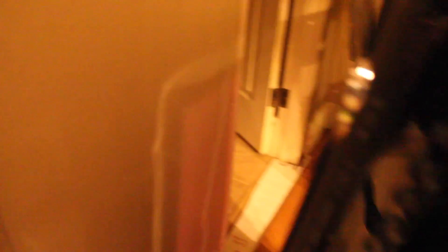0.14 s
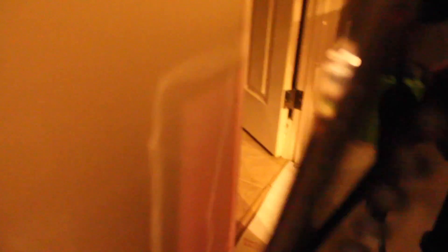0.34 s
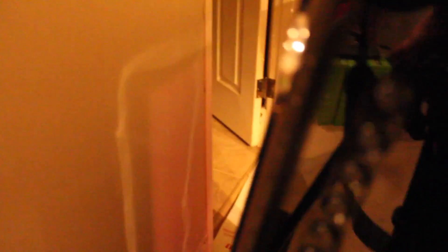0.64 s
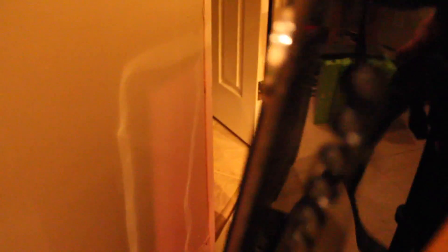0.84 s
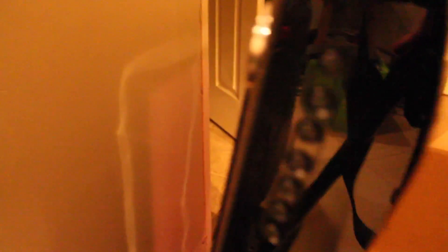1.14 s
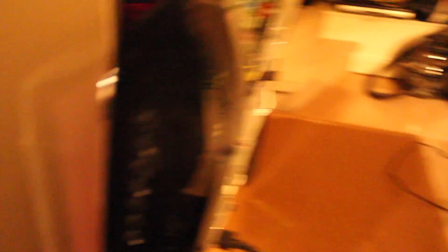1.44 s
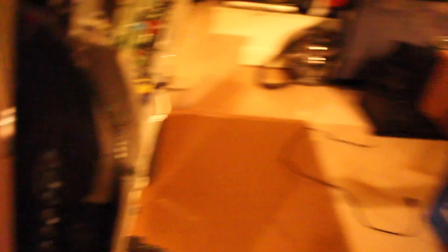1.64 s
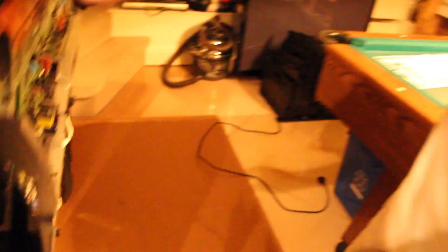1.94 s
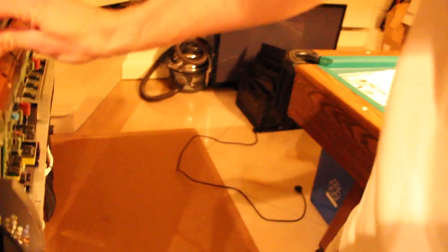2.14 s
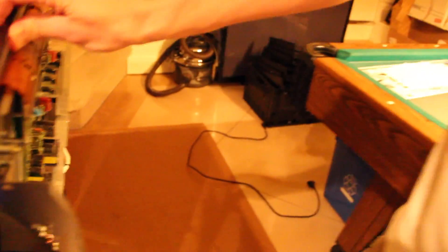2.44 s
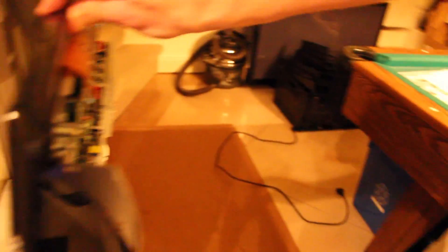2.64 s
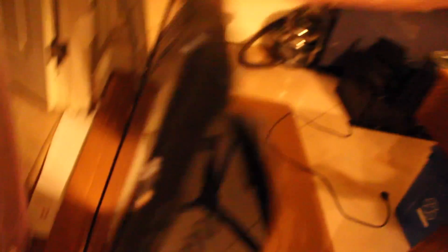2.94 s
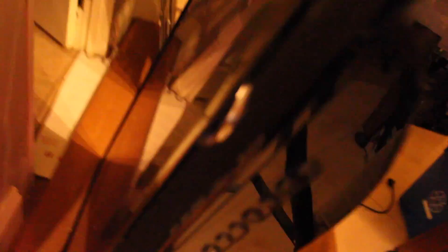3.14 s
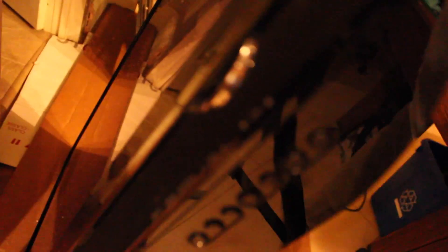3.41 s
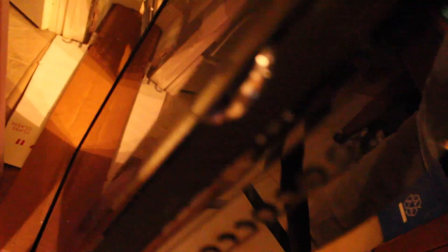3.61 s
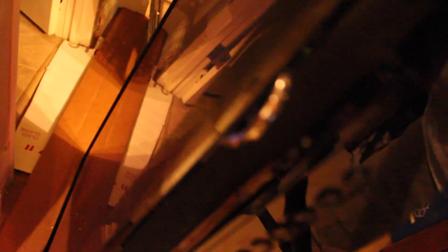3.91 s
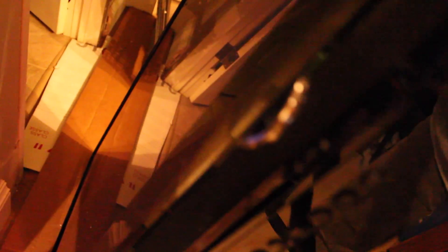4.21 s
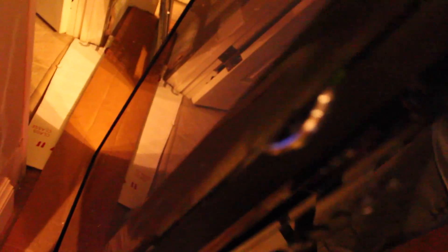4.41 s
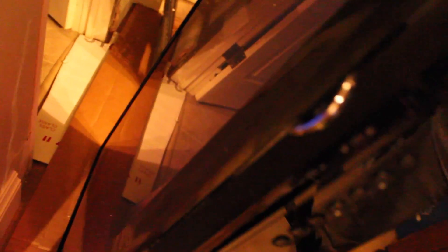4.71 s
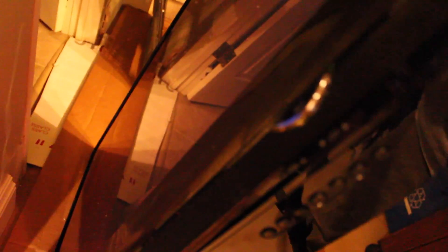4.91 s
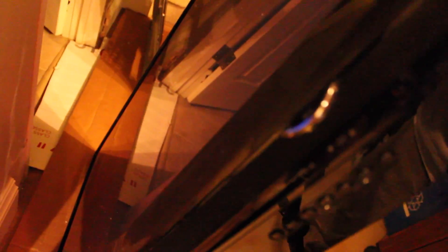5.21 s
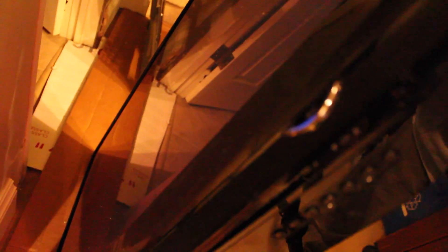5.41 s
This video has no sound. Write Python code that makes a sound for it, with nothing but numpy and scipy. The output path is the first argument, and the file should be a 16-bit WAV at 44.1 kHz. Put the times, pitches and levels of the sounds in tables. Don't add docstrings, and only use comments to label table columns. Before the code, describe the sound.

In a quiet furnished room, a handheld camera close to an open electronic device catches the fading tail of a thud, then a dense flurry of metal chassis knocks, dry plastic taps and crisp relay clicks. After a second and a half it thins: two thin metal pings, low camera bumps and rustling, a cluster of relay clicks around three seconds, then mostly hiss and one last snap near five.

```python
import sys
import numpy as np
from scipy import signal
from scipy.fft import rfft, irfft
from scipy.io import wavfile
from scipy.ndimage import uniform_filter1d

SR = 44100
rng = np.random.default_rng(int(sys.argv[2]) if len(sys.argv) > 2 else 0)


def transcribe(u):
    v = np.clip(np.atleast_2d(u).T, -1, 1)
    q = np.round(v * 32767).astype(np.int16)
    wavfile.write(sys.argv[1], SR, q)


def how_loud(loudness_db):
    steps = np.asarray(loudness_db, float) / 20
    return 10 ** steps


N = 244975


def evened(x):
    return x / np.sqrt(np.mean(x ** 2) + 1e-20)


def peaked(x):
    return x / (np.abs(x).max() + 1e-12)


def read(points, hz):
    f, value = np.transpose(points)
    return np.interp(np.log(hz + 1), np.log(f + 1), value)


def add(mix, start_s, sound):
    part = mix[round(start_s * SR):][:len(sound)]
    part += sound[:len(part)]


def noise(spectrum, patchy_db, size):
    frames = 4 * N // size + 5
    hz = np.fft.rfftfreq(size, 1 / SR)
    real, imaginary, patches = rng.standard_normal((frames, len(hz), 3)).T
    patches = uniform_filter1d(patches, size=10, axis=0)
    patches = evened(uniform_filter1d(patches, size=8, axis=1))
    level_db = read(spectrum, hz)[:, None] + patchy_db * patches
    z = (real + 1j * imaginary) * how_loud(level_db)
    return evened(signal.istft(z, nperseg=size, noverlap=3 * size // 4)[1][:N])


def ring(lines, spread, count):
    hz, db, t60 = np.transpose(lines)
    t = np.arange(count)[:, None] / SR
    fading = how_loud(db - 60 * t / t60)
    detune = rng.uniform(-0.9, 1, (3, len(hz)))
    clusters = sum(np.sin(2 * np.pi * hz * (1 + spread * u) * t) * fading for u in detune)
    return peaked(clusters.sum(1))


def struck_body(body, modes, body_db, thump_db, upper_db, tick_db):
    hz, db = np.transpose(body)
    db = db + [thump_db + 11.5, thump_db + 12.0, body_db - 8.0,
               upper_db + 2.5, upper_db + 1.5, tick_db - 4, tick_db - 2.5]
    bins = np.abs(np.fft.fftfreq(4096, 1 / SR))
    resonances = sum(lift / (1 + (2 * (bins - f) / width) ** 2) for f, width, lift in modes)
    db = read(np.transpose([hz, db]), bins) + resonances
    causal = np.exp(np.conj(signal.hilbert(np.log(how_loud(db)))))
    return np.fft.ifft(causal).real[:2048]


def contact_burst(rise_ms, chatter_ms, lead_db, rebound_ms, rebound_db):
    ms = np.arange(2048) / SR * 1000
    shape = (1 - np.exp(-ms / rise_ms)) * np.exp(-ms / chatter_ms)
    shape += how_loud(rebound_db) * np.interp(ms - rebound_ms, ms, shape, left=0)
    uneven = how_loud(1.8 * rng.standard_normal(len(ms)))
    contacts = rng.standard_normal(len(ms)) * uneven * shape
    add(contacts, rise_ms / 1000, how_loud([lead_db]))
    z = rfft(contacts, 4096)
    white = z / np.sqrt(uniform_filter1d(np.abs(z) ** 2, size=50))
    return irfft(white)[:2048]


# frequency in Hz, time to fall by 60 dB in seconds.
ROOM_FADE = [(150, 0.34), (600, 0.31), (2000, 0.32), (5000, 0.4), (10000, 0.22), (16000, 0.11)]


def room_tail():
    echoes = np.zeros(SR // 2)
    at = np.arange(300, SR // 2 - 12, 12)
    echoes[at + rng.integers(0, 12, len(at))] = rng.choice([-1., 1.], len(at))
    hz, t, z = signal.stft(echoes, SR, nperseg=256)
    fading = how_loud(-60 * t / read(ROOM_FADE, hz)[:, None])
    tail = signal.istft(z * fading, SR, nperseg=256)[1]
    return tail / np.linalg.norm(tail)


def hit(row, law, body, modes, drive_db, **contact):
    _, body_db, thump_db, hard_db = row
    upper_db, share, room_db = law
    upper_db = body_db + upper_db + share * hard_db
    response = struck_body(body, modes, body_db, thump_db, upper_db, tick_db=body_db + hard_db)
    response = how_loud(drive_db) * response
    contacts = contact_burst(**contact)
    sound = how_loud(room_db) * signal.fftconvolve(response, room_tail())
    add(sound, 0, signal.fftconvolve(response, contacts))
    return sound


# start in seconds, body in dB, thump in dB, hardness (tick over body) in dB.
SNAPS = [
    (0.236, -40.5, -52.5, 4.5),
    (0.296, -57.5, -52, 10),
    (0.574, -42, -50, 7.5),
    (0.645, -33.5, -52, -1.5),
    (1.815, -38.5, -66, 2),
    (2.702, -34.5, -42.5, -3),
    (3.205, -33, -47, -3),
    (4.954, -35.5, -45, 0.5),
]
# frequency in Hz, level in dB.
RELAY_COLOUR = [(60, -18.5), (200, 8), (900, 3), (2300, 3), (4000, -1.5), (7000, -2), (16000, -11)]
# frequency in Hz, width in Hz, lift in dB.
RELAY_RESONANCES = [(700, 120, 13.5), (1013, 170, 12.5), (1460, 280, -2.5), (1780, 67, 1), (2220, 160, 2.5),
                    (3250, 80, 6), (3730, 80, 10), (4320, 200, 5.5), (6420, 170, 0), (7780, 410, 5)]
# upper body over body in dB, share of hardness reaching the upper body, room in dB.
SNAP_LAW = (-.6, 0.45, -8)


def relay_snaps():
    mix = np.zeros(N)
    for row in SNAPS:
        add(mix, row[0], hit(row, SNAP_LAW, RELAY_COLOUR, RELAY_RESONANCES, drive_db=28.5, rise_ms=0.18,
                             chatter_ms=4.2, lead_db=11.5, rebound_ms=6, rebound_db=-4))
    return mix


# start in seconds, body in dB, thump in dB, hardness in dB.
RELEASES = [
    (0.504, -27.5, -46, -10),
    (0.847, -23.5, -57, -20.5),
    (3.147, -44, -73, -6),
    (3.415, -28.5, -51, -19),
    (3.472, -27.5, -40, -16.5),
]
# frequency in Hz, level in dB.
RELEASE_COLOUR = [(60, -23), (200, 8.5), (900, 6.5), (2200, -0.5), (4000, -5), (7000, 0), (16000, -10)]
# frequency in Hz, width in Hz, lift in dB.
RELEASE_RESONANCES = [(738, 92, 6.8), (1040, 110, 3.6), (2120, 250, 4.5), (2960, 390, 4.7),
                      (3940, 180, 9.7), (7600, 660, 4.8)]
# upper body over body in dB, share of hardness reaching the upper body, room in dB.
FALL_LAW = (1, 0.53, -11.5)


def relay_releases():
    mix = np.zeros(N)
    for row in RELEASES:
        add(mix, row[0], hit(row, FALL_LAW, RELEASE_COLOUR, RELEASE_RESONANCES, drive_db=27.5, rise_ms=0.46,
                             chatter_ms=5.4, lead_db=15.5, rebound_ms=5, rebound_db=-4))
    return mix


# frequency in Hz, level in dB, time to fall by 60 dB in seconds.
ARMATURE_LINES = [(677, -5, 0.32), (1790, 1, 0.52), (2650, -4, .3), (3300, -4, .35), (3620, -5, .5),
                  (4300, -3, .4), (5100, -5, .25)]
ARMATURE_PEAKS = [-51, -62, -55, -44, -56, -50, -40, -54]


def armature_ring():
    mix = np.zeros(N)
    for row, ring_db in zip(SNAPS, ARMATURE_PEAKS):
        add(mix, row[0], how_loud(ring_db) * ring(ARMATURE_LINES, spread=0.012, count=12000))
    return mix


# start in seconds, body in dB, thump in dB, hardness in dB.
CHASSIS_KNOCKS = [(0.693, -31.5, -46, -30), (0.796, -63, -47, -7), (0.86, -30, -38, -28),
                  (0.983, -61, -47, -10), (1.119, -40.5, -53, -14.5), (1.155, -31.5, -49.5, -42.5),
                  (1.173, -28, -45.5, -35), (1.3, -62.5, -69, 0), (2.211, -33, -59, -34.5),
                  (2.257, -51, -51, -26), (2.532, -47, -55, -36), (2.855, -49, -50, -16),
                  (3.722, -46.5, -66, -31),
                  (.004, -17.5, -49, -24), (0.022, -31.5, -55, -12), (0.049, -26, -62, -30),
               (.110, -24.5, -43, -24), (0.499, -36, -49, -32), (.543, -26, -36.5, -44),
               (.738, -38, -43.5, -26), (1.0259, -25.5, -28, -21), (1.0309, -21, -39.5, -30),
               (3.172, -48, -64, -34), (3.196, -45, -66, -41), (3.393, -48, -51.5, -21)]
# frequency in Hz, level in dB.
CHASSIS_COLOUR = [(70, -5.5), (170, 4.5), (900, 1.5), (1900, 4), (3500, -5.5), (6000, 4), (16000, -19)]
# frequency in Hz, width in Hz, lift in dB.
CHASSIS_RESONANCES = [(665, 350, 6.8), (1200, 220, 7.4), (1690, 190, 1.2), (3000, 300, 1.4),
                      (5660, 660, 2.8)]
# upper body over body in dB, share of hardness reaching the upper body, room in dB.
KNOCKING_LAW = (7, 0.71, -7.5)


def chassis_knocks():
    mix = np.zeros(N)
    for row in CHASSIS_KNOCKS:
        add(mix, row[0], hit(row, KNOCKING_LAW, CHASSIS_COLOUR, CHASSIS_RESONANCES, drive_db=26.5, rise_ms=0.58,
                             chatter_ms=4.2, lead_db=10, rebound_ms=4, rebound_db=-12))
    return mix


# start in seconds, body in dB, thump in dB, hardness in dB.
SOLID_BLOWS = [
    (0.512, -13, -43, -34.5),
    (.521, -30.5, -47, -5),
    (0.5246, -18, -35.5, -15.5),
    (0.5601, -24, -44, -19.5),
    (0.6016, -24.5, -67, -30),
    (1.040, -19, -53, -30.5),
    (1.0803, -20, -58, -29.5),
    (1.145, -39, -51, -12.5),
    (1.619, -37, -69, -30),
]
# upper body over body in dB, share of hardness reaching the upper body, room in dB.
SOLID_LAW = (5.6, .6, -13)


def chassis_clatter():
    mix = np.zeros(N)
    for row in SOLID_BLOWS:
        add(mix, row[0], hit(row, SOLID_LAW, CHASSIS_COLOUR, CHASSIS_RESONANCES, drive_db=26, rise_ms=1.12,
                             chatter_ms=1.97, lead_db=7, rebound_ms=3, rebound_db=-14))
    return mix


# start in seconds, body in dB, thump in dB, hardness in dB.
DRY_TAPS = [
    (0.397, -22.5, -40.5, -39),
    (0.761, -20, -35.5, -44),
    (1.449, -31.5, -78, -38),
    (1.89, -29.5, -54, -23.5),
    (3.104, -27, -55.5, -18),
]
# frequency in Hz, level in dB.
PLASTIC_COLOUR = [(100, -51), (330, -0.5), (1150, 5), (1900, 3.5), (3300, -8), (4200, 8.5), (14000, -17)]
# frequency in Hz, width in Hz, lift in dB.
PLASTIC_RESONANCES = [(1180, 74, 4.6), (1510, 320, 4.2), (2200, 200, 5.1), (3020, 400, 3.2),
                      (4000, 260, 7.7), (4640, 190, 3), (5600, 200, 6.9)]
# upper body over body in dB, share of hardness reaching the upper body, room in dB.
TAPPING_LAW = (-7, .17, -16.5)


def plastic_taps():
    mix = np.zeros(N)
    for row in DRY_TAPS:
        add(mix, row[0], hit(row, TAPPING_LAW, PLASTIC_COLOUR, PLASTIC_RESONANCES, drive_db=29.5, rise_ms=0.55,
                             chatter_ms=1.74, lead_db=9, rebound_ms=2.7, rebound_db=-5))
    return mix


# start in seconds, body in dB, thump in dB, hardness in dB.
METAL_PINGS = [
    (1.625, -36, -53, -4),
    (1.937, -34.5, -69, -0.5),
]
# frequency in Hz, level in dB.
SPRING_COLOUR = [(150, -16), (400, -8), (1300, 4), (2200, 0.5), (3800, 3), (5800, 1.5), (15000, -5.5)]
# frequency in Hz, width in Hz, lift in dB.
FIRST_RESONANCES = [(1313, 30, 21.4), (1800, 220, 8.5), (3200, 630, 8), (4900, 400, 7.8), (5800, 400, 4.8),
                    (7300, 420, 11.6), (10700, 770, 9.8)]
SECOND_RESONANCES = [(1376, 140, 9.9), (1990, 420, 10.3), (3850, 310, 17.2), (4860, 450, 5.9),
                     (5570, 620, 11.8), (6440, 430, 8)]
# frequency in Hz, level in dB, time to fall by 60 dB in seconds.
FIRST_LINES = [(1300, -9, 0.3), (1760, -3, 0.32), (4790, 3, .25), (5300, -15, .3), (6000, -14, .25),
               (7230, -22, .2)]
SECOND_LINES = [(3940, -10, .18), (3870, 2, 0.63), (5300, 3, .2)]
# upper body over body in dB, share of hardness reaching the upper body, room in dB.
PINGING_LAW = (-11.5, .2, -1.5)


def metal_pings():
    mix = np.zeros(N)
    parts = [(FIRST_RESONANCES, FIRST_LINES, -41), (SECOND_RESONANCES, SECOND_LINES, -42)]
    for row, (resonances, lines, ring_db) in zip(METAL_PINGS, parts):
        add(mix, row[0], how_loud(ring_db) * ring(lines, spread=0.0099, count=14000))
        add(mix, row[0], hit(row, PINGING_LAW, SPRING_COLOUR, resonances, drive_db=28, rise_ms=0.22,
                             chatter_ms=2.1, lead_db=-5, rebound_ms=2.5, rebound_db=-3))
    return mix


# frequency in Hz, level in dB per Hz.
THUD_COLOUR = [(35, -58), (60, -28), (212, -40), (315, -14), (363, -17), (417, -2), (749, -2.5),
               (903, -8.5), (1110, -4), (2840, -18.5), (16000, -52)]
# start level in dB, change in dB per second.
THUD_FADE = [(-25, -86.5), (-38.5, -67)]


def earlier_thud():
    clumps = uniform_filter1d(rng.standard_normal(N), size=150)
    clumps = evened(uniform_filter1d(clumps, size=150))
    wash = noise(THUD_COLOUR, patchy_db=-1.5, size=256) * how_loud(0.59 * clumps)
    treble = signal.sosfilt(signal.butter(2, 2500, "high", fs=SR, output="sos"), wash)
    t = np.arange(N) / SR
    body_fade, treble_fade = [how_loud(start_db + slope * t) for start_db, slope in THUD_FADE]
    return body_fade * evened(wash - treble) + treble_fade * evened(treble)


# start in seconds, peak in dB, frequency in Hz.
CAMERA_BUMPS = [(1.576, -38.5, 410), (1.608, -51, 40.6), (1.626, -35.5, 426), (1.729, -52, 48.7),
                (1.849, -50, 46), (1.899, -48, 61.4), (1.978, -46, 58.4), (2.061, -47, 45.4),
                (2.104, -43.5, 51.4), (2.15, -57, 65), (2.199, -55, 53.8)]


def camera_bumps():
    mix = np.zeros(N)
    t = np.arange(4000) / SR
    for start_s, peak_db, hz in CAMERA_BUMPS:
        wobble = np.sin(2 * np.pi * hz * t) * t * np.exp(-t * hz / 0.58)
        add(mix, start_s, how_loud(peak_db) * peaked(wobble))
    return mix


# start in seconds, hold in seconds, level in dB.
JOLTS = [(0.0, 0.0091, -52), (0.408, .02, -57.5), (0.525, .03, -59), (0.605, 0.23, -58), (1.02, .03, -59),
         (1.1, .05, -66), (1.598, 0.018, -54), (1.752, .2, -65), (1.96, 0.26, -62.5), (2.537, 0.035, -63),
         (2.707, 0.022, -61), (3.206, 0.017, -58), (3.41, .06, -63), (3.733, 0.85, -75.5),
         (4.96, 0.024, -59.5), (5.18, 0.018, -69), (5.442, .1, -74)]
# frequency in Hz, level in dB per Hz.
RUMBLE_COLOUR = [(15, -19), (45, -17), (110, 6), (190, -5), (300, -49)]


def hand_rumble():
    t = np.arange(N) / SR
    shake = np.zeros(N)
    for start_s, hold_s, db in JOLTS:
        rise_db = 354 * np.maximum(start_s - t, 0)
        fall_db = 174 * np.maximum(t - start_s - hold_s, 0)
        shake = np.maximum(shake, how_loud(db - rise_db - fall_db))
    return shake * noise(RUMBLE_COLOUR, patchy_db=1.5, size=1024)


# time in seconds, level in dB.
RUSTLE_LEVEL = [
    (0.45, -63),
    (0.7, -54.5),
    (1.1, -62.5),
    (3.1, -69.5),
]
# frequency in Hz, level in dB per Hz.
RUSTLE_COLOUR = [(88, -38), (150, -13.5), (473, -0.5), (689, -8.5), (1020, -10), (1770, -7.5), (2490, -19),
                 (4020, -15), (9000, -36), (11700, -52), (19800, -120)]


def hand_rustle():
    s, db = np.transpose(RUSTLE_LEVEL)
    level_db = np.interp(np.arange(N) / SR, s, db, left=-120, right=-120)
    return how_loud(level_db) * noise(RUSTLE_COLOUR, patchy_db=2.5, size=256)


# frequency in Hz, level in dB per Hz.
HISS_COLOUR = [(16, -44), (28, -22), (64, 5), (131, -20), (154, -2.5), (269, -3), (424, -8.5), (685, -10),
               (742, -7), (803, -9.5), (1260, -10.5), (2460, -12), (15000, -20), (16300, -30)]


def microphone_hiss():
    return how_loud(-59) * noise(HISS_COLOUR[:-1], patchy_db=0.5, size=1024)


def scene():
    relay = relay_snaps() + relay_releases() + armature_ring()
    blows = chassis_knocks() + chassis_clatter() + plastic_taps() + metal_pings()
    camera = camera_bumps() + hand_rumble() + hand_rustle() + microphone_hiss()
    return (relay + blows + earlier_thud() + camera)[None]


def roll_off(x):
    return signal.sosfilt(signal.butter(12, 16660, fs=SR, output="sos"), x)


def record(dry):
    edge = signal.firwin(511, 15950, fs=SR)
    mix = signal.oaconvolve(dry, edge[None], "same") + 0.001
    return roll_off(mix)


dry = scene()
out = record(dry)
transcribe(out)
```